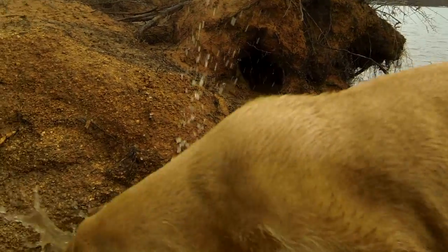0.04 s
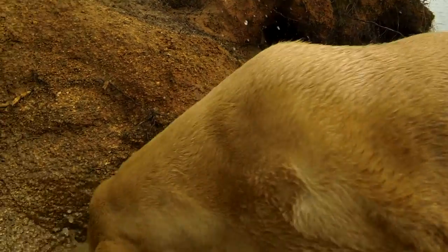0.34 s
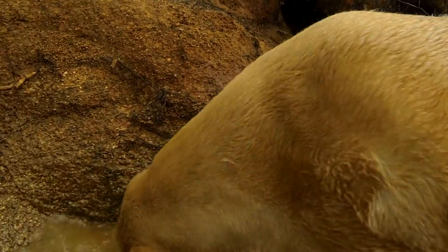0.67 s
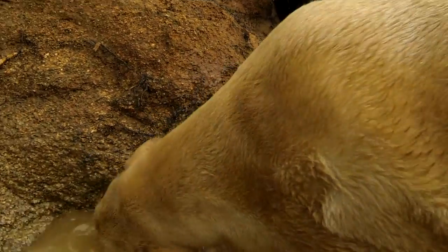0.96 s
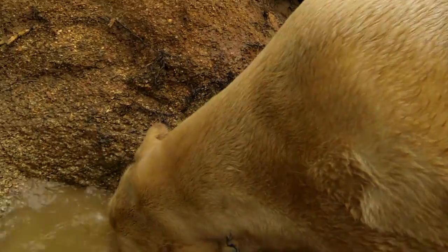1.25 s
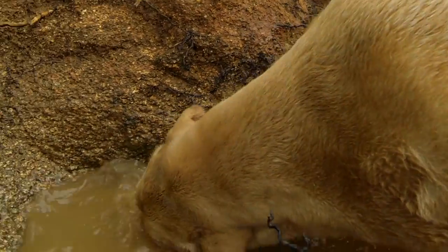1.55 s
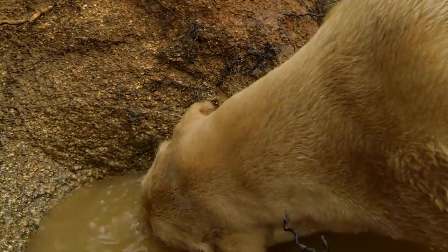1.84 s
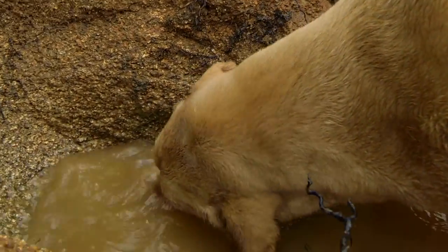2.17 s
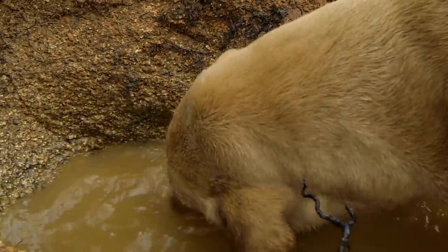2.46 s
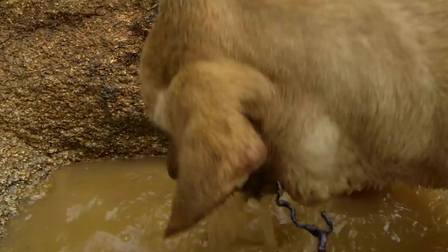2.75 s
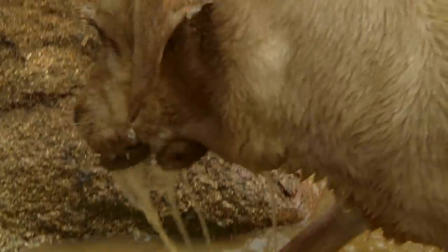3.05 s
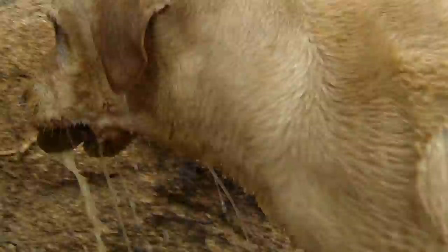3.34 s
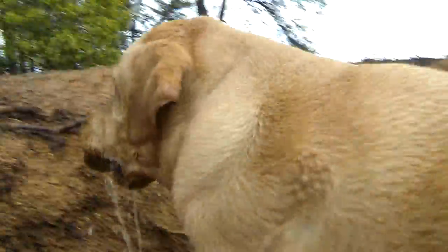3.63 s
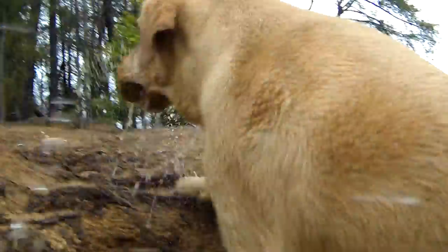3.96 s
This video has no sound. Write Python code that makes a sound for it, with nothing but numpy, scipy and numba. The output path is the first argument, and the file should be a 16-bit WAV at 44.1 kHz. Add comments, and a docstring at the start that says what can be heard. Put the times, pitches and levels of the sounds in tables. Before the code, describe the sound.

Water splashes close by as a dog enters a puddle, fading by 0.5 seconds into drips and blips, with a plop at about 1 second. Soft gurgles, bubbles and wet ticks follow as its muzzle roots underwater. Around 2.9 seconds water dribbles from its jowls. From 3.2 to 4 seconds its paws make louder splashes, slaps and spray. Low wind rumbles on the microphone throughout, with no echo.

```python
"""A muddy puddle in the open air, microphone close to the water, no echo.
A dog splashes in, roots about with its muzzle under water, then lifts its head and wades out.
Air pockets ring as rising blips, water drips from its jowls, and its paws throw up clouds of
bubbles and spray. Underneath it all, wind rumbles on the microphone."""
import sys
import numpy as np
from scipy import signal
from scipy.fft import rfft, irfft
from scipy.io import wavfile
from scipy.ndimage import uniform_filter1d
from numba import njit

SR = 44100
rng = np.random.default_rng(int(sys.argv[2]) if len(sys.argv) > 2 else 0)


def master(y):
    """Save y as 16-bit WAV."""
    cut = np.clip(np.atleast_2d(y).T, -1, 1)
    pcm = np.round(cut * 32767)  # scale
    wavfile.write(sys.argv[1], SR, pcm.astype(np.int16))


N = 176400

# Air pockets at muzzle and paws:
# (time [s], starting pitch [Hz], rise [Hz/s], swell [s], decay [s], level [dB])
AIR_POCKETS = [ (.030, 629, 1510, 0.0053, 0.014, -21), (.040, 1135, 5000, 0.002, 0.0048, -20.5),
               (.076, 442, 6000, 0.0031, 0.0025, -8), (0.627, 487, 20500, 0.0071, 0.0087, -25),
               (.766, 414, 13700, 0.002, 0.011, -24), (.789, 340, 3000, 0.0023, 0.0042, -23),
               (.988, 715, 2020, 0.0074, 0.013, -25), (1.180, 340, 9100, 0.02, 0.015, -35),
               (1.278, 274, 6680, 0.031, 0.015, -29.5), (1.593, 430, 34000, 0.0035, 0.005, -21),
               (1.604, 897, 17900, 0.0035, 0.013, -27.5), (1.616, 453, 10600, 0.002, 0.013, -23.5),
               (1.685, 390, 1000, 0.0036, 0.013, -30), (1.848, 342.7, 4010, 0.0038, 0.015, -24),
               (1.885, 386, 10850, 0.0074, 0.012, -28), (1.979, 293.5, 4880, 0.0042, 0.023, -27),
               (2.020, 440, 8000, 0.031, 0.0071, -37), (2.109, 364, 4730, 0.0029, 0.021, -26.5),
               (2.209, 188, 1490, 0.011, 0.0054, -19), (2.275, 415, 13660, 0.0098, 0.012, -29),
               (2.31, 460, 10000, .006, 0.0092, -32), (2.615, 647, 3900, 0.011, 0.02, -31),
               (2.850, 716, 300, 0.0049, 0.0089, -33.5), (3.077, 550, 6000, 0.00067, 0.0016, -16),
               (3.122, 574, 3000, 0.012, 0.0075, -30), (3.202, 1085, 7040, 0.0024, 0.0083, -18.5),
               (3.227, 1220, 1500, 0.0012, 0.0082, -16.5), (3.242, 485, 800, 0.0029, 0.0079, -13),
               (3.289, 439.6, 400, 0.0016, 0.02, -14), (3.318, 340, 4030, 0.004, 0.0143, -24),
               (3.392, 964, 1990, 0.0028, 0.0023, -9.5), (3.406, 637, 6140, 0.0033, 0.017, -27),
               (3.453, 510, 3000, 0.0035, 0.0036, -14.5), (3.556, 1042, 2000, 0.0019, 0.014, -15.5),
               (3.628, 616, 2000, 0.0019, 0.0078, -17.5), (3.647, 437, 6000, 0.0027, 0.0031, -20.5),
               (3.689, 1464, 4900, 0.003, 0.023, -20.5), (3.726, 862, 3000, 0.0019, .011, -18.5),
               (3.735, 1064, 3000, 0.0019, 0.0055, -13.5), (3.771, 354, 5100, 0.0032, 0.021, -18.5),
               (3.866, 588, 16000, 0.014, 0.0051, -14.5), (3.926, 570, 2000, 0.0036, 0.0025, -14)]
# Drops falling into the puddle: (time [s], starting pitch [Hz], level [dB])
DRIPS = [ (.026, 2500, -13.5), (0.232, 2540, -18.5), (.288, 2125, -21.5), (.433, 2700, -16.5),
         (.448, 3440, -20.5), (0.645, 3640, -30.5), (.909, 2390, -21), (.977, 1210, -27.5),
         (1.056, 2370, -24.5), (1.086, 3340, -32), (1.089, 2500, -32), (1.691, 5360, -39),
         (2.64, 2500, -29.5), (2.892, 4600, -22.5), (2.933, 3260, -19), (2.937, 1190, -28.5),
         (2.954, 3000, -23), (2.970, 2590, -19), (3.029, 4270, -29), (3.053, 2250, -25), (3.055, 3280, -23),
         (3.08, 2690, -23.5), (3.113, 3450, -24.5), (3.128, 2820, -25.5), (3.177, 4520, -22),
         (3.190, 2530, -16.5), (3.425, 2490, -18), (3.502, 3080, -22), (3.606, 3500, -13),
         (3.988, 2720, -9.5), (3.990, 3230, -10.5)]
# Smacks of water on water and fur: (time [s], peak level [dB], upper edge [Hz], decay [s])
SMACKS = [ (0.0778, -12, 1200, 0.0051), (.209, -15, 12000, 0.0081), (.273, -14, 12000, 0.0023),
          (.432, -16, 10700, 0.0054), (0.449, -15, 11000, .0015), (1.028, -18, 5000, 0.0008),
          (1.053, -9, 6100, 0.0021), (1.163, -20.5, 5500, 0.0025), (1.429, -22, 1100, 0.002),
          (2.201, -23.5, 805, 0.0084), (2.216, -29.5, 900, 0.0056), (2.292, -36, 12200, 0.002),
          (2.408, -24, 3080, 0.0015), (2.451, -32.5, 14000, 0.0029), (2.566, -30, 7000, 0.0029),
          (2.596, -30, 8000, 0.0044), (2.784, -25, 11200, 0.0045), (2.838, -25.5, 11600, 0.0018),
          (2.8642, -22, 13000, 0.0011), (2.891, -33, 9000, .0006), (2.953, -19.5, 10900, 0.0021),
          (3.018, -31, 13000, .0008), (3.0285, -20.5, 11000, 0.001), (3.0876, -25, 11900, 0.0006),
          (3.2752, -16, 10000, 0.0014), (3.308, -19, 4000, 0.0013), (3.423, -5, 2880, 0.0064),
          (3.564, -12.5, 2840, 0.012), (3.604, -12.5, 12000, .004), (3.784, -13, 1430, 0.0031),
          (3.835, -12, 14000, 0.026), (3.9172, -5.5, 13000, 0.0044), (3.974, -15, 11000, 0.00063)]
# Fader moves for the thrown water: (time [s], churn [dB], droplets [dB], spray [dB])
SPLASH_FADERS = [ (0, -26.5, -30, -40), (.09, -28.5, -31, -39.5), (.23, -32, -29.5, -38.5),
                 (.39, -39.5, -40, -47.5), (.435, -39.5, -38, -43), (.49, -45.5, -45, -48),
                 (.60, -52.5, -50.5, -53), (.69, -41, -36, -48), (.80, -45, -46, -47),
                 (.88, -40.5, -38, -41), (.975, -42, -45, -51), (1.11, -51.5, -51.5, -55),
                 (1.38, -56.5, -80, -58), (1.52, -50, -55.5, -62.5), (1.70, -59, -61.5, -67),
                 (2.55, -63, -60.5, -72), (2.65, -46.5, -47, -60.5), (2.77, -72, -57, -67),
                 (2.95, -49, -46, -60), (3.11, -44.5, -56, -59), (3.17, -58, -55, -58),
                 (3.21, -32, -34.5, -51), (3.33, -34, -36, -42.5), (3.426, -20.5, -29, -34.5),
                 (3.485, -36, -32, -39), (3.52, -33, -28.5, -28.5), (3.60, -28.5, -24, -28),
                 (3.74, -29, -26, -33.5), (3.82, -28.5, -34, -33), (3.87, -26, -22.5, -29.5),
                 (3.925, -25, -23.5, -23.5), (3.955, -32, -30.5, -30.5), (4, -31.5, -22.5, -26)]
# Spells of wet ticks, from the rooting muzzle and then the streaming jowls:
# (start [s], end [s], rate [1/s], typical level [dB], typical pitch [Hz])
TICK_SPELLS = [(0.501, 1.398, 71, -38, 2180), (1.3, 2.801, 60, -43, 8000), (2.878, 3.161, 450, -31, 4500),
               (2.92, 3.16, 130, -32, 1200)]
# Soft wash under the churning bubbles: (frequency [Hz], relative level [dB])
WASH_SPECTRUM = [(100, -41), (250, -18), (600, 5.5), (1400, 7), (2200, -4), (5000, -13), (15000, -33.5)]
# Wind on the microphone and distant air: (frequency [Hz], relative level [dB])
WIND_SPECTRUM = [(10, -5), (25, -3), (55, 1), (110, -1), (170, -8.5), (260, -12), (400, -18.5),
                 (700, -33.5), (1200, -33.5), (2500, -61), (6000, -71), (15000, -61)]

TOP_HZ = 15250


def splash():
    """Water thrown up close by: bubbles churn over a soft wash, droplets and spray land in surges."""
    times, *faders = np.array(SPLASH_FADERS, float).T
    churn_gain, droplet_gain, spray_gain = (undb(np.interp(np.arange(N) / SR, times, db)) for db in faders)
    churn = cloud(low_hz=394.5, high_hz=1885, per_s=697, cycles=3.5, spread_db=6, gain_db=-1.5)
    churn += noise(WASH_SPECTRUM)
    surge = undb(1.8 * wander(per_s=55))
    droplets = cloud(low_hz=1851, high_hz=4971, per_s=815, cycles=4, spread_db=1.5, gain_db=-2)
    spray = cloud(low_hz=4521, high_hz=15000, per_s=3500, cycles=2, spread_db=2, gain_db=-0.5)
    spray += crackle()
    return churn_gain * churn + surge * (droplet_gain * droplets + spray_gain * spray)


def cloud(low_hz, high_hz, per_s, cycles, spread_db, gain_db):
    """Countless small bubbles, each ringing with a random size, pitch and length."""
    when, pitch, size, length = rng.random((int(per_s * N / SR), 4)).T
    hz = low_hz * (high_hz / low_hz) ** pitch
    decays = cycles * 2 ** (2 * length - 1) / hz
    return undb(gain_db) * steady(tiny_rings(when * N / SR, hz, decays, grain_gain(size, spread_db)))


def crackle(per_s=170, decay_s=0.0021):
    """Sharp ticks of spray landing on rock and wet fur."""
    hits = (rng.random(N) < per_s / SR) * grain_gain(rng.random(N), spread_db=2.5)
    envelope = signal.lfilter([1], [1, -np.exp(-1 / (decay_s * SR))], hits)
    spatter = band(envelope * rng.standard_normal(N), low_hz=2180, high_hz=12600)
    return undb(-6) * steady(spatter)


def air_pockets():
    """Large air pockets ring, each with a weak overtone, trembling in the churned water."""
    out = np.zeros(N)
    for at, hz, rise, swell, decay, db in AIR_POCKETS:
        for ratio, mode_db in (1, 0), (1.9, -20):  # fundamental, overtone
            blip = bubble(ratio * hz, ratio * rise, swell, decay, waver=0.026, flutter_db=4)
            add(out, at, undb(db + mode_db) * blip)
    tremble = unit(band(rng.standard_normal(N), low_hz=59, high_hz=333))
    return out * (1 + .18 * tremble)


def bubble(hz, rise, swell, decay, waver=0, flutter_db=0):
    """One bubble: it swells, dies away, and rises in pitch as it nears the surface."""
    t = np.arange(int((swell + 6 * decay) * SR) + 2) / SR
    attack = np.sin(np.pi / 2 * np.minimum(t / swell, 1))
    envelope = attack * np.exp(-np.maximum(t - swell, 0) / decay)
    pitch = hz + rise * t
    if waver:
        knots = np.linspace(0, t[-1], 20)
        drift, flutter = (np.interp(t, knots, row) for row in rng.standard_normal((2, 20)))
        pitch *= 1 + waver * drift
        envelope *= undb(flutter_db * flutter)
    return envelope * np.sin(2 * np.pi * np.cumsum(np.minimum(pitch, SR / 2)) / SR)


def plop(at=1.026, first_hz=1200, surface_hz=1950, life_s=.0275, fade_s=.015, db=-10.5):
    """One big pocket rings, sweeps ever faster upward, and ends as it bursts."""
    out, t = np.zeros(N), np.arange(int(life_s * SR)) / SR
    pitch = first_hz + (surface_hz - first_hz) * (t / life_s) ** 3
    envelope = undb(db) * np.exp(-(t / fade_s) ** 2 / 2 - t / life_s)
    add(out, at, envelope * np.sin(2 * np.pi * np.cumsum(pitch) / SR))
    return out


def drips(ring_cycles=10.1, splat_decay_s=0.0039):
    """Each drop splats on the surface and traps a tiny bubble that plinks."""
    plinks, impacts, t = np.zeros(N), np.zeros(N), np.arange(1024) / SR
    for at, hz, db in DRIPS:
        add(plinks, at, undb(db) * bubble(hz, rise=10.8 * hz, swell=0.00044, decay=ring_cycles / hz))
        add(impacts, at, undb(db - 3) * np.exp(-t / splat_decay_s))
    splats = impacts * rng.standard_normal(N)
    for _ in range(2):
        splats = band(splats, low_hz=900, high_hz=6000)
    return plinks + splats


def smacks():
    """Water slaps or a film bursts near the microphone: a snap, then a short burst of noise."""
    out, t = np.zeros(N), np.arange(2048) / SR
    snap = 4.33 * (t == 0)
    for at, db, top_hz, decay in SMACKS:
        burst = rng.standard_normal(len(t)) * np.exp(-t / decay)
        crack = band(snap + burst, low_hz=210, high_hz=top_hz)
        add(out, at, undb(db) * crack / np.abs(crack).max())
    return out


def patter(spread_octaves=0.85, spread_db=7, typical_decay_s=0.00025):
    """Separate little ticks of bursting films and landing drops, each with its own colour."""
    out = np.zeros(N)
    for start, end, per_s, db, typical_hz in TICK_SPELLS:
        count = int(per_s * (end - start))
        colour, size, length = np.clip(rng.standard_normal((count, 3)).T, -2, 2)
        hz = np.minimum(typical_hz * 2 ** (spread_octaves * colour), TOP_HZ)
        treble_trim = np.sqrt(np.minimum(typical_hz / hz, 1))
        gains = undb(db + spread_db * size) * treble_trim
        out += tiny_rings(rng.uniform(start, end, count), hz, typical_decay_s * 2 ** length, gains)
    return out


def gurgle(start=1.1, end=2.3, per_s=20, low_hz=180, high_hz=380, typical_db=-37):
    """Soft, low glugs at random as the water sloshes round the muzzle."""
    out = np.zeros(N)
    for when, pitch, size in rng.random((int(per_s * (end - start)), 3)):
        hz = low_hz * (high_hz / low_hz) ** pitch
        glug = bubble(hz, rise=1670, swell=0.009, decay=0.02)
        add(out, start + when * (end - start), undb(typical_db) * (.5 + size) * glug)
    return out


def wind(level_db=-31.1, gust_db=1.3):
    """Wind on the microphone: a low, lightly gusting rumble behind the water."""
    return noise(WIND_SPECTRUM) * undb(level_db + gust_db * wander(per_s=9))


@njit
def tiny_rings(starts, hz, decays, gains):
    """Sum of short decaying rings that glide upward."""
    out = np.zeros(N)
    glide = 0.025  # relative pitch rise in one decay time
    for k in range(len(starts)):
        step = 2 * np.pi * hz[k] / SR
        phasor = gains[k] + 0j
        turn = np.exp(1j * step - 1 / (decays[k] * SR))
        bend = np.exp(1j * step * glide / (decays[k] * SR))
        first = int(starts[k] * SR)
        for i in range(first, min(N, first + int(7 * decays[k] * SR))):
            out[i] += phasor.imag * min(1., (i - first) * step / np.pi)  # half-cycle fade-in
            phasor *= turn
            turn *= bend
    return out


def grain_gain(draw, spread_db):
    """Turn uniform draws into many small gains and a few large ones, capped at 5.6 spreads."""
    return undb(spread_db * np.minimum(-np.log(1 - draw), 5.6))


def undb(db):
    """Decibels to gain."""
    return 10 ** (np.asarray(db) / 20)


def unit(x):
    """Scale to rms 1."""
    return x / np.sqrt(np.mean(x ** 2))


def steady(x):
    """Even out the slow level of a cloud, keeping its grain."""
    power = uniform_filter1d(uniform_filter1d(x ** 2, size=2200), size=2200)
    return x / np.sqrt(power + 1e-12)


def add(out, at, sound):
    """Mix a sound in at a time in seconds."""
    i = int(np.clip(at * SR, 0, N - 1))
    out[i:i + len(sound)] += sound[:N - i]


def band(x, low_hz, high_hz):
    """Gentle band-pass."""
    return signal.sosfilt(signal.butter(2, [low_hz, high_hz], "band", fs=SR, output="sos"), x)


def noise(spectrum):
    """Noise of rms 1, shaped by (frequency [Hz], relative level [dB]) points."""
    hz, db = np.array(spectrum, float).T
    bin_hz = np.maximum(np.arange(N // 2 + 1) * SR / N, 1)
    gains = undb(np.interp(np.log(bin_hz), np.log(hz), db))
    return unit(irfft(rfft(rng.standard_normal(N)) * gains, N))


def wander(per_s):
    """A smooth random drift of rms 1."""
    hop = int(SR / per_s)
    path = np.interp(np.arange(N) / hop, np.arange(400), rng.standard_normal(400))
    return unit(uniform_filter1d(path, hop))


def scene():
    """The water and the wind at one close microphone, in mono."""
    return (air_pockets() + plop() + gurgle() + drips() + smacks() + patter() + splash() + wind())[None]


def record(dry):
    """The recorder cuts the top with a steep low-pass."""
    return signal.sosfilt(signal.ellip(10, .2, 80, TOP_HZ, fs=SR, output="sos"), dry)


dry = scene()
out = record(dry)
master(out)
```